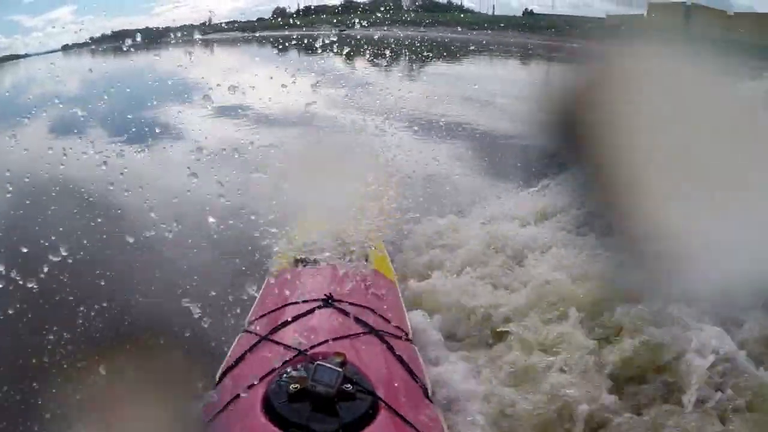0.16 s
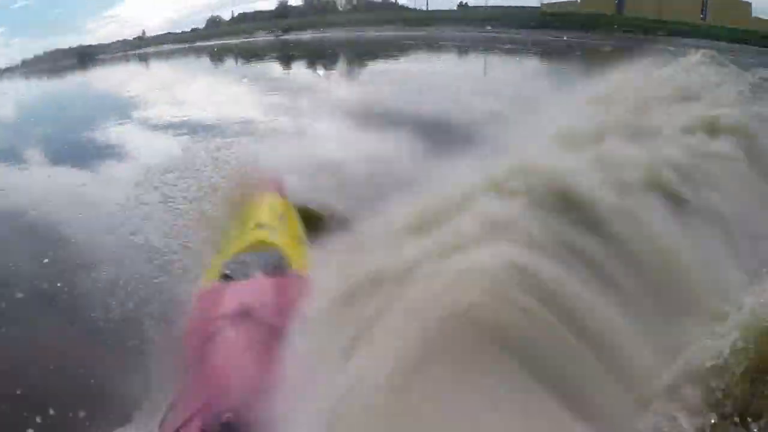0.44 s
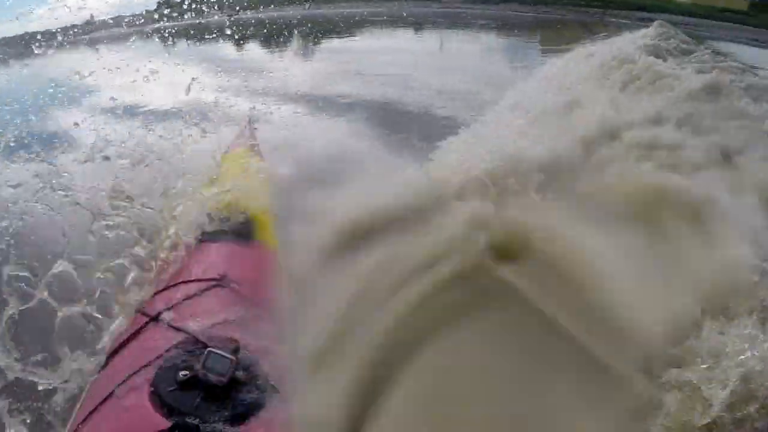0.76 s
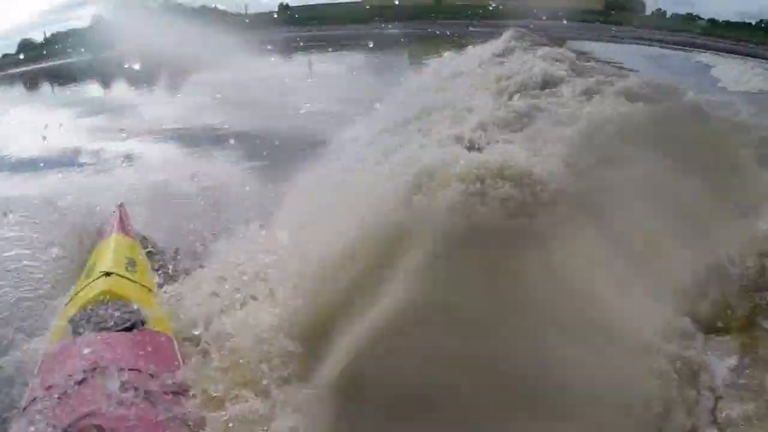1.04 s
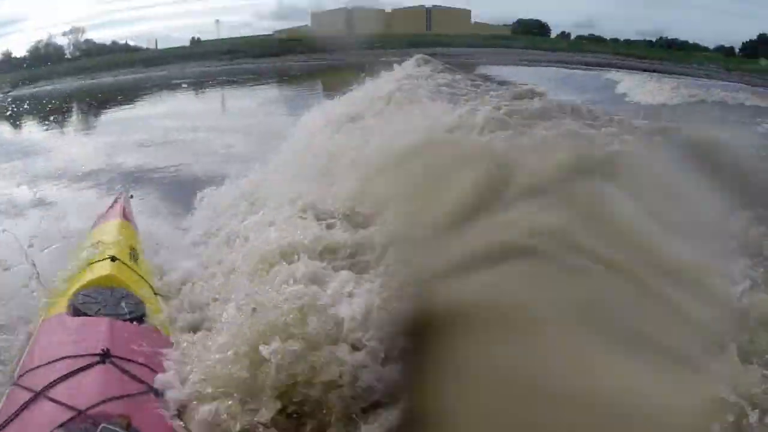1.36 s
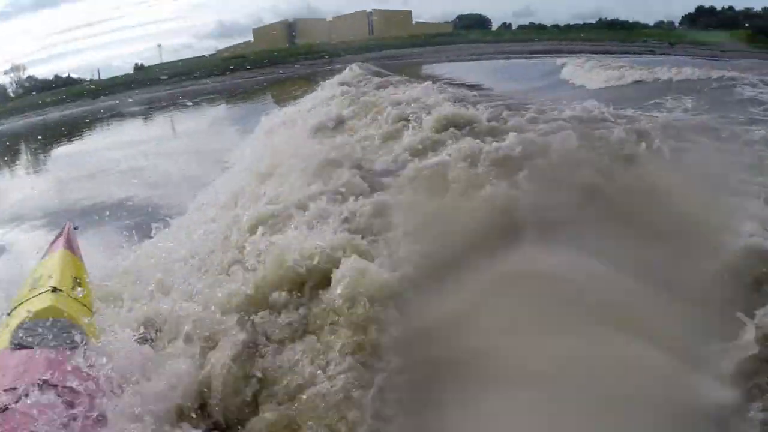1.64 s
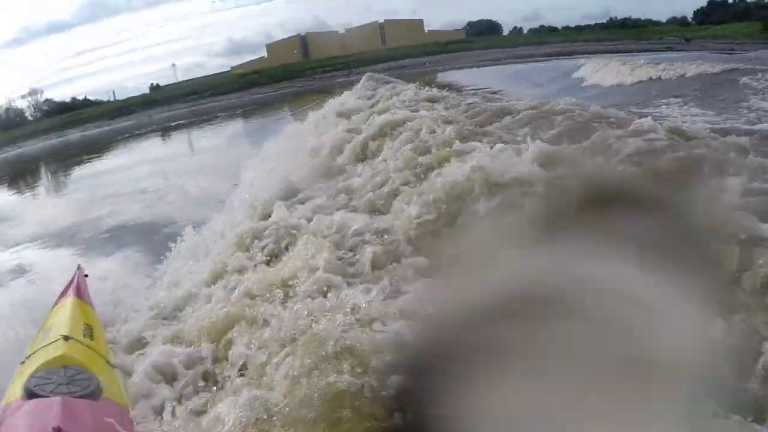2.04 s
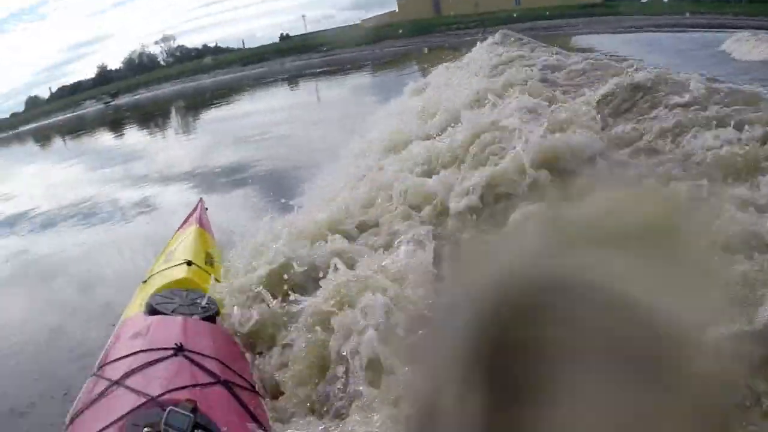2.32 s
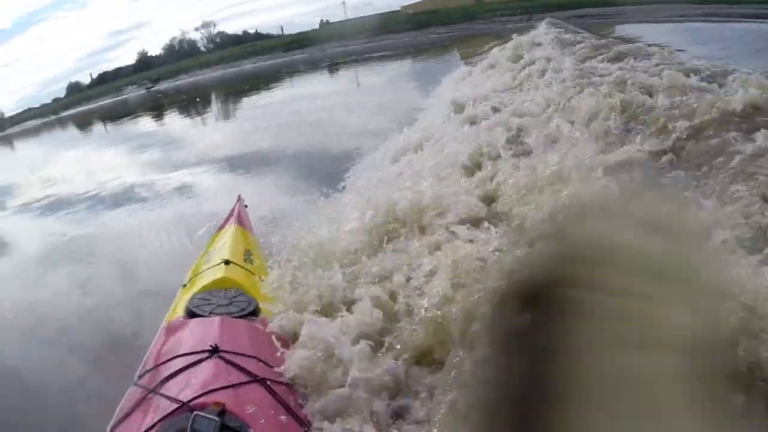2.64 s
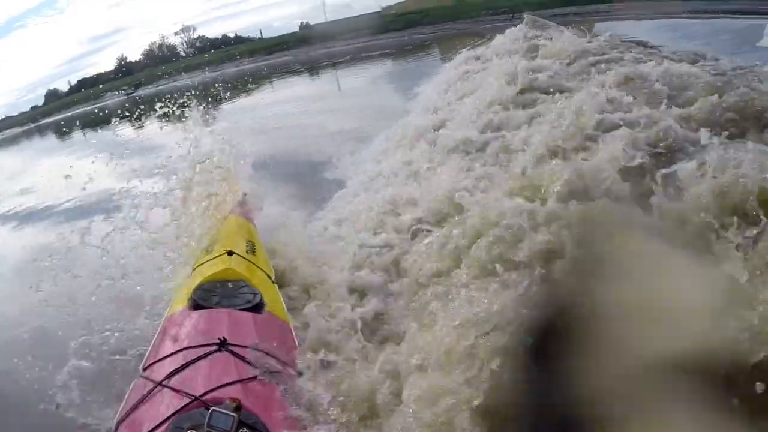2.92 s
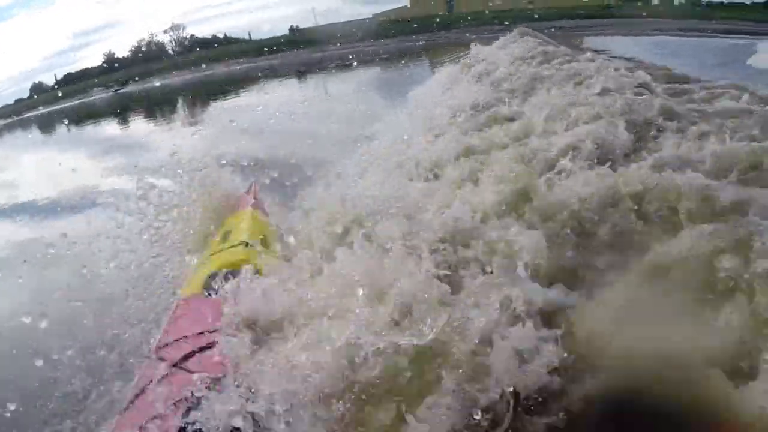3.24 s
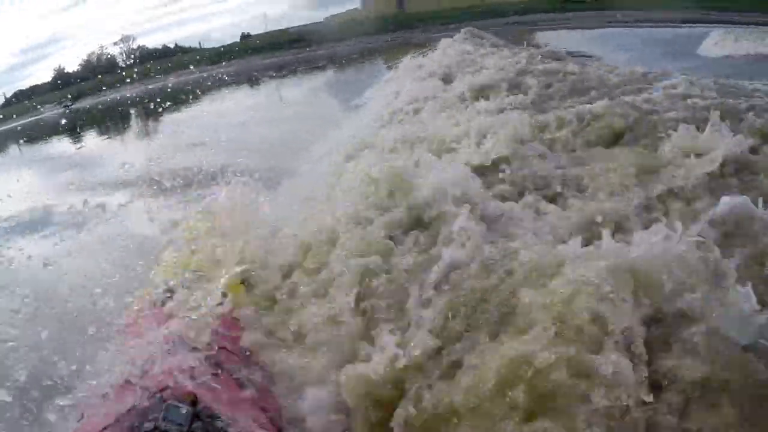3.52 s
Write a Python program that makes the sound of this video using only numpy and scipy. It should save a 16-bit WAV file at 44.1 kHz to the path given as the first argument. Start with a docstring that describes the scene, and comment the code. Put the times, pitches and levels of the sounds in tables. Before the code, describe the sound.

White water roars and crackles around a kayak on a river wave, sounding boxed in by a plastic camera case. Two early splashes slap and thud on the case, then spray keeps ticking over a low shaking rumble.

```python
"""White water roars and crackles, heard from inside a plastic camera case on a kayak riding a river wave.
Bursting foam rings the resonances of the case, spray and big drops tick and slap on it, heavier water
thuds. The mount shakes with a low rumble and once groans with a falling pitch, while a hollow note
swells in the roar."""
import sys
import numpy as np
from scipy import signal
from scipy.fft import rfft, irfft
from scipy.io import wavfile
from scipy.ndimage import uniform_filter1d

SR = 44100
rng = np.random.default_rng(int(sys.argv[2]) if len(sys.argv) > 2 else 0)


def output_pcm(signal):
    """Save a mono or channel-first signal as 16-bit PCM at the path in sys.argv[1].

    Samples are clipped to [-1, 1] before scaling.
    """
    pcm = np.clip(np.atleast_2d(signal).T, -1, 1) * 32767
    wavfile.write(sys.argv[1], SR, np.round(pcm).astype(np.int16))


N = 162288

# case resonances (frequency [Hz], gain [dB], t60 [s])
CASE_MODES = [(831, -11, 0.0098), (1300, 2.5, 0.011), (1626, 4, 0.016), (1964, 4, 0.011),
              (2265, 0.5, 0.0081), (2650, 1, 0.011), (3348, -10.5, 0.0069), (4370, -1.5, 0.0064),
              (5000, -6.5, 0.002), (5680, -2, 0.0031), (6870, -26, 0.017), (8240, -41, 0.0032),
              (9500, -31.5, 0.00091), (11500, -42, 0.0047)]


def undb(db):
    return 10 ** (np.asarray(db) / 20)


def unit_rms(x):
    return x / np.sqrt(np.mean(x ** 2))


def curve(table, column=1):
    """One column of a time table, interpolated per sample."""
    rows = np.array(table)
    return np.interp(np.arange(N) / SR, rows[:, 0], rows[:, column])


def gate(table):
    """True between a time table's first and last rows."""
    t = np.arange(N) / SR
    return (t > table[0][0]) & (t < table[-1][0])


def coloured(x, points):
    """Filter x by (frequency [Hz], gain [dB]) points."""
    hz, rows = np.fft.rfftfreq(N, 1 / SR) + 1, np.array(points)
    gain_db = np.interp(np.log(hz), np.log(rows[:, 0]), rows[:, 1])
    return irfft(rfft(x) * undb(gain_db), N)


def ring(x, hz, t60_s):
    """One mode, unity gain at its centre."""
    r = 1000 ** (-1 / (t60_s * SR))
    gain = (1 - r * r) / 2
    return signal.lfilter([gain, 0, -gain], [1, -2 * r * np.cos(2 * np.pi * hz / SR), r * r], x)


def walk(rate_hz):
    """Random steps, smoothed twice; unit RMS."""
    hold = int(SR / rate_hz)
    steps = np.repeat(rng.standard_normal(N // hold + 1), hold)
    return unit_rms(uniform_filter1d(uniform_filter1d(steps, hold), hold)[:N])


def case(push):
    """push(k, hz) drives case mode k; push(-1, hz) leaks through unrung; the walls dull both."""
    # leak below, then above the split (frequency [Hz], gain [dB])
    leaks = [(2000, -14.5), (10000, -17.5)]
    split_hz, wall_hz = 7500, 5780
    rung = sum((-1) ** k * undb(db) * ring(push(k, hz), hz, t60_s)
               for k, (hz, db, t60_s) in enumerate(CASE_MODES))
    low, high = (undb(db) * push(-1, hz) for hz, db in leaks)
    split = signal.butter(1, split_hz, fs=SR, output="sos")
    walls = signal.butter(2, wall_hz, fs=SR, output="sos")
    return signal.sosfilt(walls, rung + high + signal.sosfilt(split, low - high))


def splats(times_s, peak_db, centre_hz, fall_db_oct, spatter_ms):
    """Drops hit the case: an impulse plus decaying spatter, each with its own mix of modes."""
    age = np.arange(600)[None]
    decay_samples = np.clip(spatter_ms, .03, 3)[:, None] * SR / 1000
    spatter = rng.standard_normal((len(times_s), age.size)) * np.exp(-age / decay_samples)
    force = spatter - 4.9 * (age == 0)
    scatter_db = rng.standard_normal((len(times_s), len(CASE_MODES) + 1))

    def push(k, hz):
        octaves_off = np.abs(np.log2(hz / centre_hz))
        return force * undb(scatter_db[:, k] - fall_db_oct * octaves_off)[:, None]

    hits = case(push)
    hits *= (undb(peak_db) / np.abs(hits).max(axis=1))[:, None]
    index = (times_s * SR).astype(int)[:, None] + age
    return np.bincount(index.ravel(), hits.ravel(), N + age.size)[:N]


def rumble():
    """Lumpy low shaking of the mount."""
    # shake envelope (time [s], level [dB])
    levels = [(0, -37), (.3, -37), (.6, -36), (.85, -37.5), (1.1, -35), (1.35, -33.5), (1.5, -42),
              (1.7, -38), (1.95, -39.5), (2.2, -39), (2.45, -32), (2.65, -40), (2.85, -40.5), (3.05, -39),
              (3.22, -38), (3.43, -41), (3.68, -36)]
    # shake spectrum (frequency [Hz], gain [dB])
    spectrum = [(12, -44), (20, -2.5), (59, 2.5), (97, -9), (134, -10), (160, -12.5), (210, -53),
                (350, -120)]
    points = [(10, -40)] + list(spectrum) + [(260, -57)]  # flat floor above 260 Hz
    shake = unit_rms(coloured(rng.standard_normal(N), points))
    return shake * undb(curve(levels) + 1.7 * walk(7.9))


def groan():
    """Slip cycles of the mount: they swell and lose overtones as the pitch sinks, then fade."""
    # slip (time [s], pitch [Hz], level [dB], overtones [dB re fundamental])
    slip = [(2.21, 84, -55, -10), (2.25, 92.1, -32.5, -28), (2.3, 101.3, -41.5, -3),
            (2.36, 105.7, -24.5, -16), (2.41, 95, -26.5, -12.5), (2.44, 83.7, -21, -22),
            (2.465, 76, -12.5, -32), (2.485, 70, -14.5, -52), (2.51, 58, -23.5, -37),
            (2.54, 49.7, -31, -28), (2.58, 41.5, -30, -32), (2.62, 38, -52, -29)]
    # overtones (harmonic number, gain [dB])
    harmonics = [(2, 3), (3, 1), (4, -9.5)]
    pitch_hz = curve(slip) * (1 + 0.0093 * walk(39.54))
    phase = 2 * np.pi * np.cumsum(pitch_hz) / SR
    overtones = sum(undb(db) * np.sin(k * phase) for k, db in harmonics)
    tone = np.sin(phase) + undb(curve(slip, column=3)) * overtones
    return gate(slip) * np.sqrt(2) * undb(curve(slip, column=2)) * tone


def hollow_note():
    """Noise rings one narrow resonance, swelling briefly in the roar."""
    # swell (time [s], level [dB])
    levels = [(2.3, -60), (2.4, -33), (2.47, -35), (2.51, -33), (2.56, -34.5), (2.66, -42), (2.75, -60)]
    note = unit_rms(ring(rng.standard_normal(N), hz=2000, t60_s=0.034))
    return gate(levels) * note * undb(curve(levels))


def thuds():
    """Heavy water: a few damped cycles per blow."""
    # blows (time [s], peak [dB], pitch [Hz])
    blows = [(0.3547, -13.5, 756), (.3547, -24, 300), (0.4382, -12, 634), (0.44, -20.5, 258),
             (0.496, -20, 206), (0.992, -23.5, 298), (1.036, -18, 226), (1.08, -19.5, 253),
             (1.113, -18.5, 287), (1.1268, -12, 280), (1.128, -21, 422), (1.163, -22, 400), (1.17, -18, 99),
             (1.175, -16.5, 303), (1.197, -22.5, 307), (1.686, -28, 300), (1.734, -26.5, 70),
             (1.895, -33, 283), (3.638, -23, 280)]
    t60_cycles = 5.54
    age_s = np.arange(4000) / SR
    out = np.zeros(N + len(age_s))
    for time_s, peak_db, hz in blows:
        cycles = hz * age_s
        thud = -np.sin(2 * np.pi * cycles) * undb(-60 * cycles / t60_cycles)
        out[int(time_s * SR):][:len(age_s)] += undb(peak_db) * thud / np.abs(thud).max()
    return out[:N]


def spray(level_db, centre_hz, fall_db_oct, density_db):
    """Droplets tick on the case at random, denser when the wave throws water up."""
    # spray density before density_db is added (time [s], rate [dB re 1 tick/s])
    rates = [(0, 25.5), (.34, 24), (.4, 43.5), (.52, 47), (.62, 25.5), (.85, 29), (.97, 45), (1.08, 34),
             (1.22, 41), (1.35, 29), (1.55, 31), (1.72, 40), (1.95, 30), (2.2, 24), (2.6, 30), (3.0, 20),
             (3.45, 33.5), (3.68, 28)]
    candidates = 900
    place, lot, tone, spatter = rng.random((candidates, 4)).T
    scatter_db = 3.5 * rng.standard_normal(candidates).clip(-2, 2)
    times_s = place * (N - 1) / SR
    ticks_per_s = undb(np.interp(times_s, *np.array(rates).T) + density_db)
    share = ticks_per_s * N / SR / candidates
    thinning_db = 120 * np.clip(lot / share - 1, 0, 1)  # mutes candidates beyond the share
    peak_db = level_db + scatter_db - thinning_db
    tick_hz = centre_hz * 2 ** (1.2 * (tone - .5))
    return splats(times_s, peak_db, tick_hz, fall_db_oct, spatter_ms=0.83 * spatter)


def big_drops():
    """Single drops slap the case and stand out of the spray."""
    # hits (time [s], peak [dB], centre [Hz], fall from centre [dB/oct], spatter decay [ms, capped at 3])
    hits = [(0.354, -4, 1480, 13, 0.042), (.393, -15.5, 3000, 6, 1.1), (0.4085, -16, 5000, 2, 2),
            (0.4213, -18, 1800, 11, 0.72), (0.422, -31, 10500, 12, .6), (.431, -30, 10000, 12, .8),
            (.487, -32, 10000, 8, .3), (.538, -27, 4000, 5, .5), (0.4388, -2.5, 3970, 2, 0.55),
            (.449, -16, 1400, 15, 1.5), (0.4625, -11, 3000, 5, 1.7), (0.4905, -11, 7000, 1.5, 0.92),
            (.493, -15, 2200, 2, 1.5), (0.501, -23, 3000, 13, .6), (0.5052, -13.5, 2000, 6, 1.2),
            (0.509, -21, 2500, 8, 1), (0.52, -15, 1400, 9, 0.6), (.528, -24, 5000, 3, .6),
            (.943, -20, 1600, 10, .8), (.959, -23, 3460, 19, .8), (.99, -6, 4500, 3, 1.3),
            (1.0195, -19, 4500, 9, 1.3), (1.005, -24, 7000, 1, .8), (1.024, -32, 12000, 10, .4),
            (1.035, -10.5, 1300, 7, 1.2), (1.0382, -15, 1500, 8, 2.5), (1.035, -28, 9000, 7, .3),
            (1.039, -26, 10000, 8, 1), (1.043, -21, 3000, 13, 1.7), (1.052, -13, 3500, 3, 0.53),
            (1.055, -6.5, 4300, 6.5, 0.97), (1.06, -15, 2500, -4, 0.46), (1.071, -12.5, 2500, 13, 1.5),
            (1.0785, -5.5, 3460, 7, 1), (1.095, -21, 3000, 14, 1.8), (1.106, -21, 6000, 3, 0.67),
            (1.124, -20, 4000, 12, .6), (1.1117, -19, 1370, 10, .5), (1.127, -11, 1300, 17, 0.25),
            (1.138, -28, 10000, 11, .4), (1.163, -17, 1500, 8, 0.98), (1.197, -25, 10500, 14, 1),
            (1.213, -29, 6000, 2, .4), (1.172, -15.5, 3000, 16, 1), (1.217, -16.5, 6000, 4, 0.3),
            (1.293, -23, 6000, 8, .6), (1.562, -24, 3400, 17, 0.54), (1.577, -32, 9500, 12, .5),
            (1.591, -20, 3380, 19, .5), (1.618, -32, 10000, 10, .4), (1.637, -21, 3400, 6, .5),
            (1.668, -21.5, 9500, 8, .5), (1.787, -27, 5000, 0, .4), (1.917, -28, 3300, 12, .5),
            (1.987, -32, 10000, 10, .4), (1.806, -20, 3500, 5, 1.4), (1.684, -15, 3370, 8, 0.46),
            (1.7375, -17.5, 3030, 8, 0.25), (1.742, -18, 3000, 5, 0.74), (1.878, -20, 3600, 5, 0.55),
            (2.006, -19.5, 2200, 5, 0.4), (2.275, -29, 5000, 5, .6), (2.69, -25, 5000, 10, .8),
            (2.494, -17, 1970, 33, 3.6), (3.472, -18, 4000, 1, .6), (3.554, -22, 4000, 7, 0.52),
            (3.653, -11.5, 3220, 14, 1.5)]
    return splats(*np.array(hits).T)


def foam():
    """Bursting bubbles drive the case; adjacent half-octave bands swell together, each also flickers."""
    # foam outside the case (frequency [Hz], gain [dB])
    spectrum = [(120, 8), (300, 5.5), (600, 0), (1200, -6), (2500, -3), (5000, 0), (9000, 0.5), (15000, 6)]
    # band levels inside (time [s], 1.5-3 kHz [dB], 0.7-1.5 kHz [dB], above 3 kHz [dB], 110-700 Hz [dB])
    levels = [(0, -37.5, -44.5, -43.5, -44), (.15, -43, -43.5, -43, -44), (.3, -46.5, -42.5, -42.5, -43.5),
              (.4, -36, -41.5, -44.5, -39.5), (.5, -42, -38, -40.5, -41.5), (.6, -40.5, -43.5, -38.5, -45),
              (.7, -41.5, -42, -42, -42), (.8, -46, -42.5, -42.5, -41), (.93, -37, -43, -38, -44),
              (1.05, -31, -33, -36.5, -35.5), (1.17, -33, -35.5, -38.5, -37),
              (1.28, -32.5, -44, -38.5, -44.5), (1.42, -39.5, -41.5, -41, -43.5), (1.6, -39, -44, -39, -40),
              (1.75, -37, -39.5, -38, -43.5), (1.95, -41.5, -44, -41.5, -41),
              (2.13, -40.5, -43, -43.5, -45.5), (2.32, -38, -42.5, -41, -40.5),
              (2.42, -38.5, -41.5, -39.5, -39.5), (2.52, -32.5, -42.5, -43, -42),
              (2.62, -34.5, -42, -41, -41.5), (2.73, -38, -42, -39.5, -43.5),
              (2.88, -39.5, -44, -41.5, -43), (3.05, -37, -43.5, -40, -42.5), (3.19, -39.5, -43, -42, -43),
              (3.3, -40.5, -42.5, -38.5, -43), (3.5, -36.5, -44.5, -40, -43.5),
              (3.68, -38.5, -43, -39.5, -42.5)]
    crackle, slow, shared = 0, walk(14), walk(36.5)
    for hz in 130 * 2 ** np.arange(0, 6.9, .5):
        bursts = rng.standard_normal(N) * undb(1.54 * rng.exponential(size=N))
        shared = unit_rms(0.66 * shared + 0.73 * walk(34.9))
        flicker_db = 0.2 * slow + 0.65 * shared + 1.67 * walk(90)
        half_octave = signal.butter(1, [hz / 2 ** .25, hz * 2 ** .25], "band", fs=SR, output="sos")
        crackle += undb(flicker_db) * signal.sosfilt(half_octave, bursts)
    outside = coloured(crackle, spectrum)
    inside = rfft(case(lambda k, hz: outside))
    bins_hz = np.fft.rfftfreq(N, 1 / SR)
    above = {hz: 1 - 1 / (1 + (bins_hz / hz) ** 6) for hz in (110, 700, 1500, 3000)}
    bands = above[1500] - above[3000], above[700] - above[1500], above[3000], above[110] - above[700]
    return sum(unit_rms(irfft(inside * band, N)) * undb(curve(levels, column))
               for column, band in enumerate(bands, start=1))


def scene():
    """Water and mount, mixed to mono."""
    ticks = spray(level_db=-29, centre_hz=4200, fall_db_oct=3.5, density_db=0)
    mist = spray(level_db=-41, centre_hz=10000, fall_db_oct=10, density_db=5)
    return (foam() + hollow_note() + big_drops() + ticks + mist + thuds() + rumble() + groan())[None]


def record(dry):
    """The microphone port colours the treble; the camera cuts the top."""
    # port response (frequency [Hz], gain [dB])
    port = [(5800, -0.5), (6500, -3), (7000, 0.5), (8200, -4.5), (8700, 1), (9300, 1.5), (10300, 0.5),
            (11400, -1), (12000, 0), (15000, 4.5)]
    top_hz = 15250
    lowpass = signal.ellip(12, .2, 60, top_hz, fs=SR, output="sos")
    return signal.sosfilt(lowpass, coloured(dry, port))


dry = scene()
out = record(dry)
output_pcm(out)
```